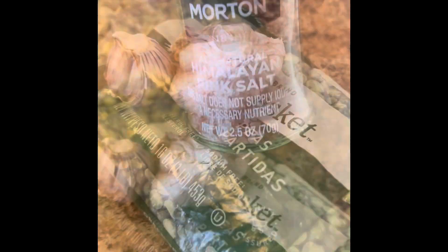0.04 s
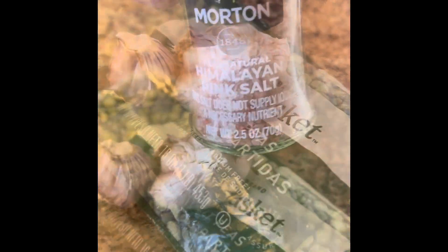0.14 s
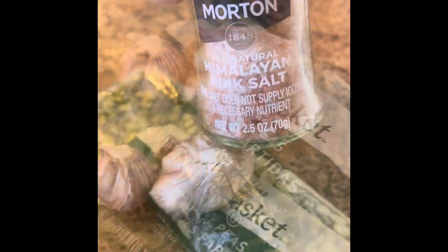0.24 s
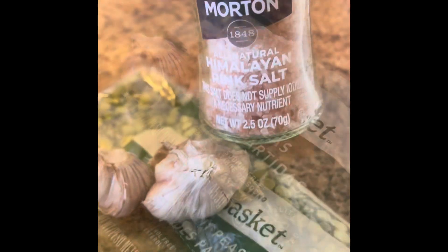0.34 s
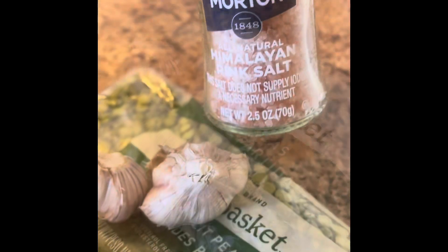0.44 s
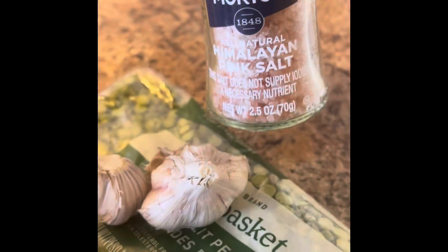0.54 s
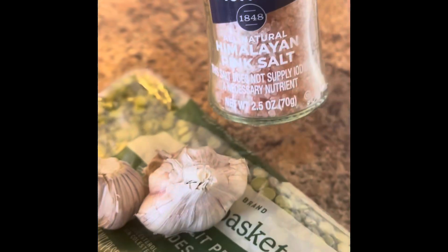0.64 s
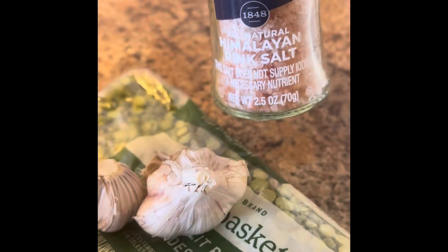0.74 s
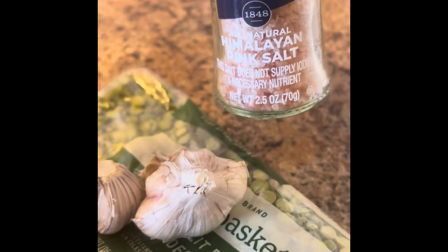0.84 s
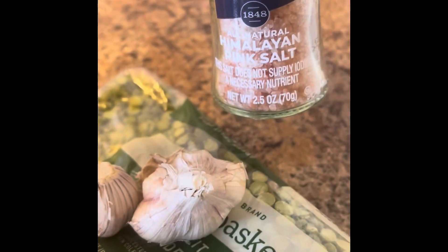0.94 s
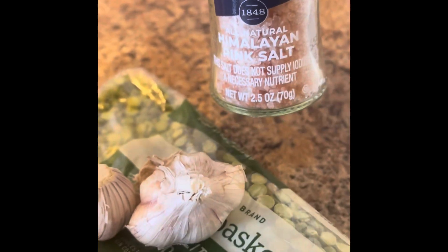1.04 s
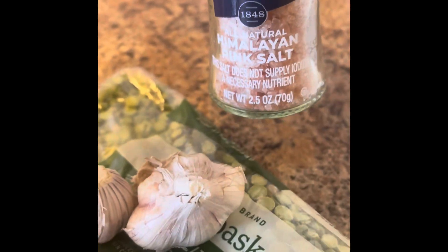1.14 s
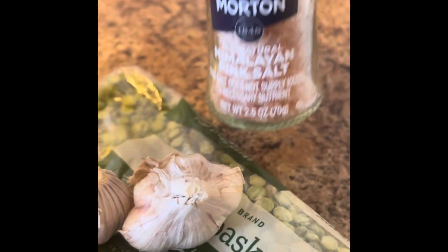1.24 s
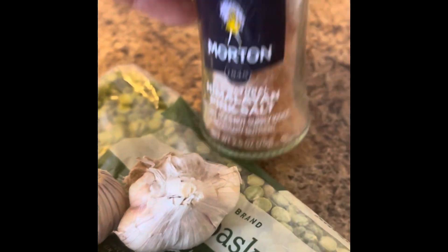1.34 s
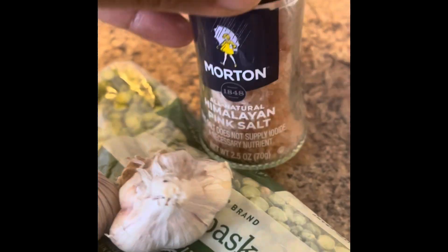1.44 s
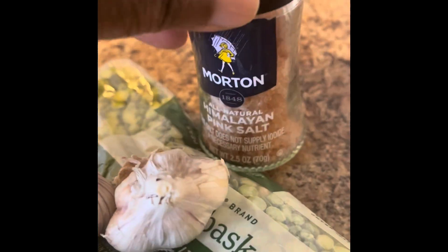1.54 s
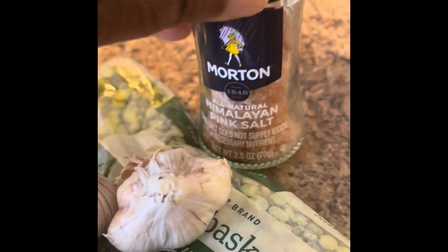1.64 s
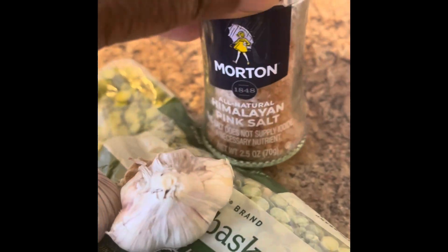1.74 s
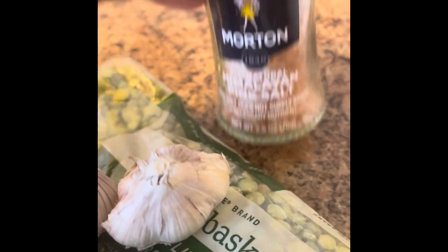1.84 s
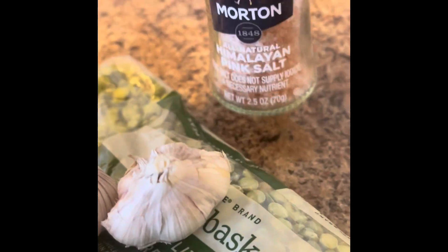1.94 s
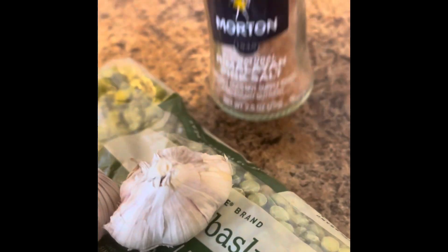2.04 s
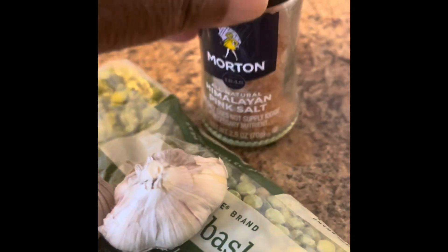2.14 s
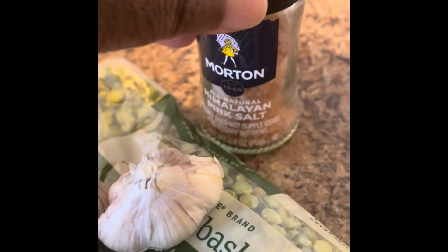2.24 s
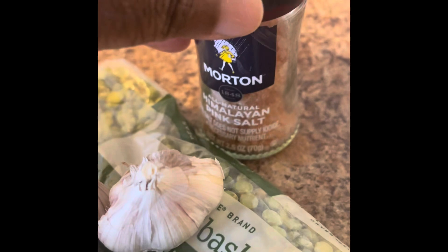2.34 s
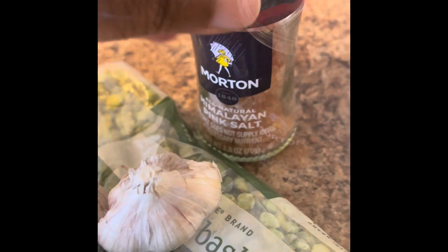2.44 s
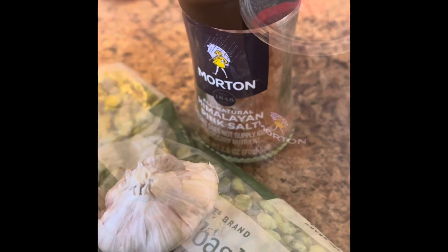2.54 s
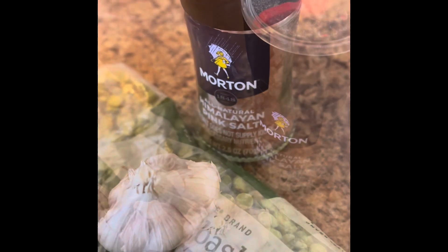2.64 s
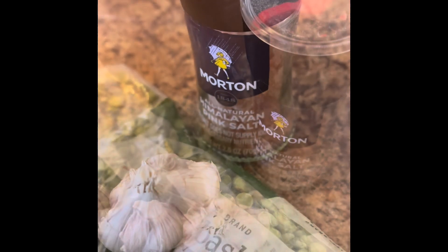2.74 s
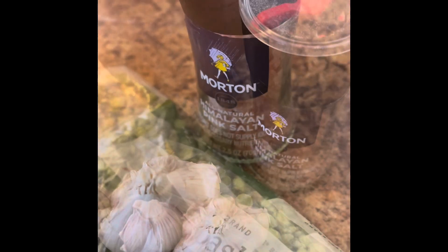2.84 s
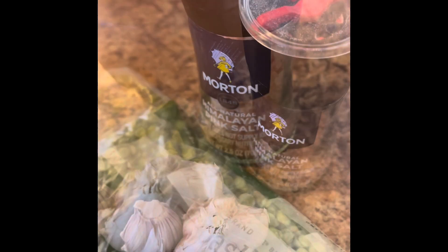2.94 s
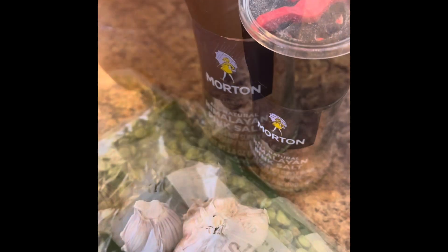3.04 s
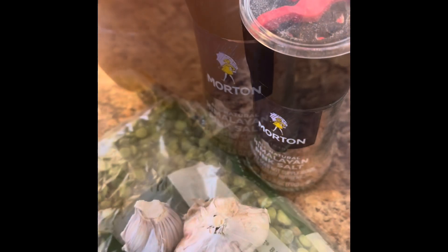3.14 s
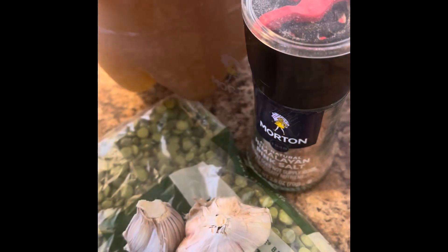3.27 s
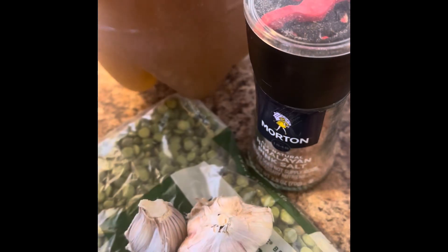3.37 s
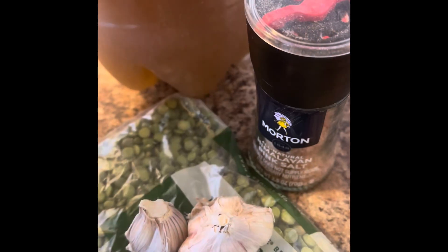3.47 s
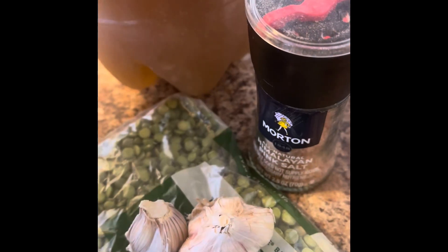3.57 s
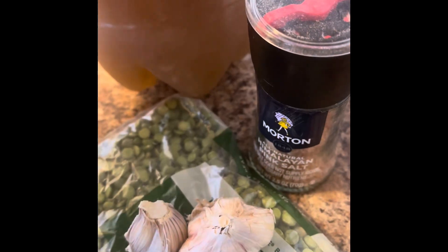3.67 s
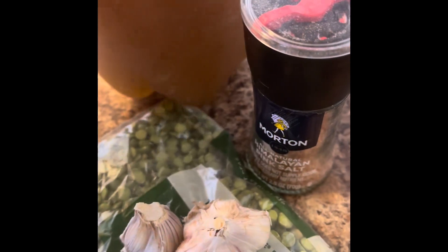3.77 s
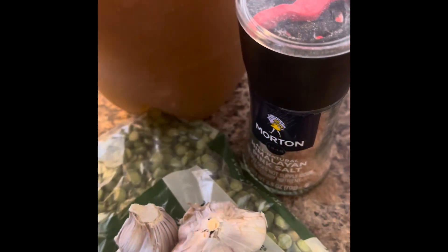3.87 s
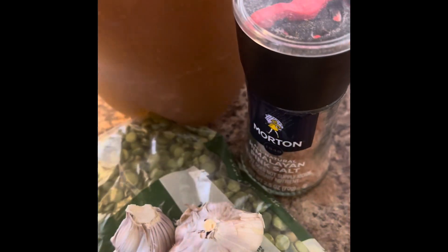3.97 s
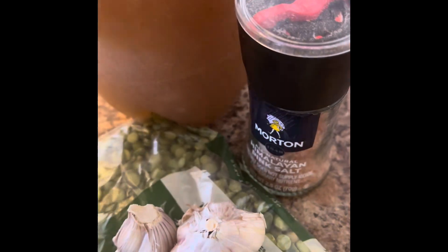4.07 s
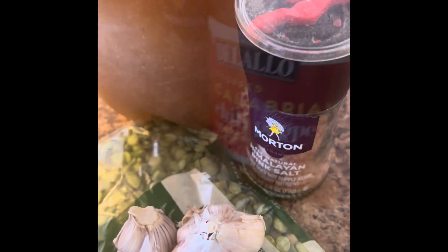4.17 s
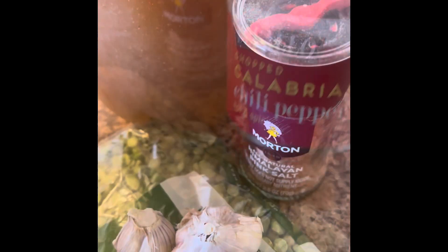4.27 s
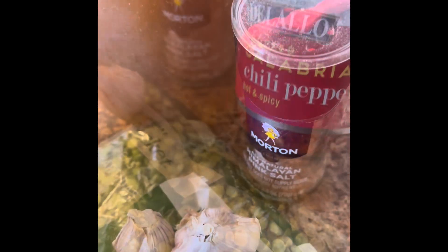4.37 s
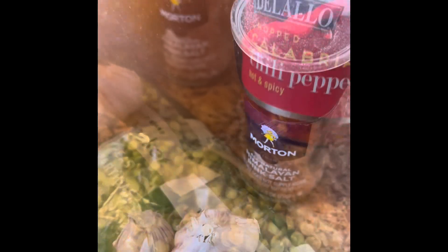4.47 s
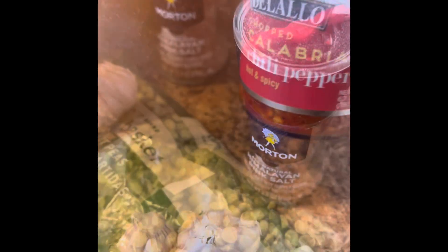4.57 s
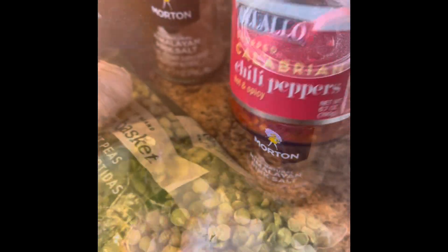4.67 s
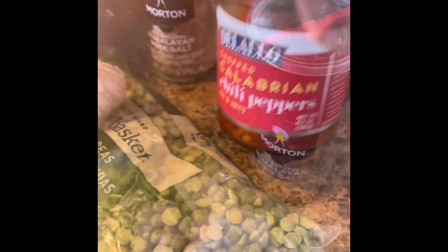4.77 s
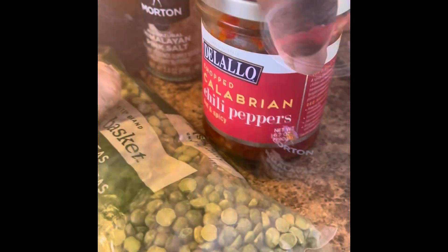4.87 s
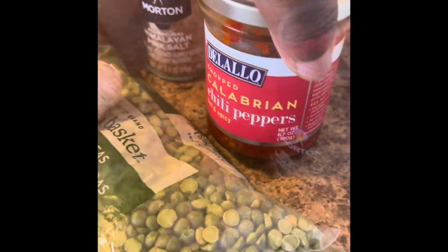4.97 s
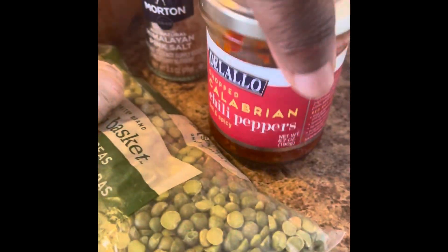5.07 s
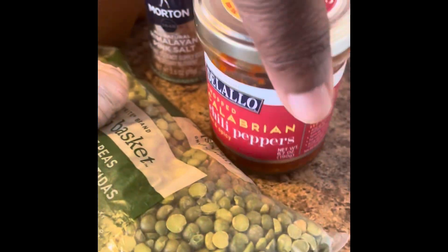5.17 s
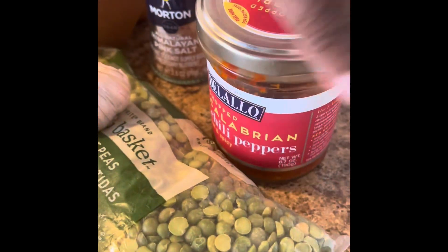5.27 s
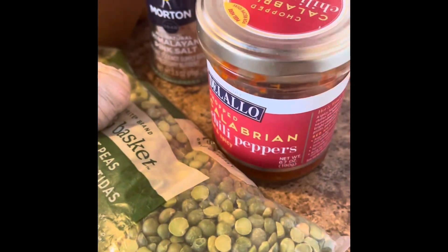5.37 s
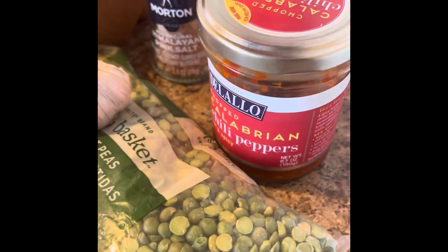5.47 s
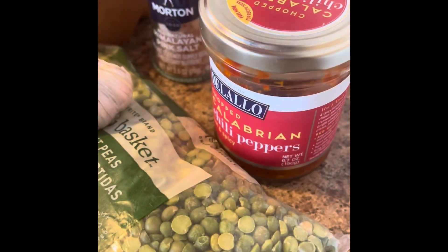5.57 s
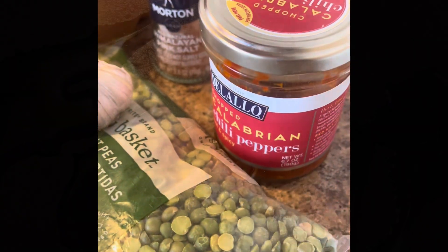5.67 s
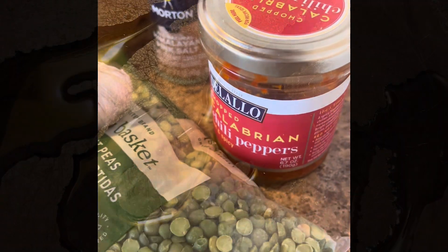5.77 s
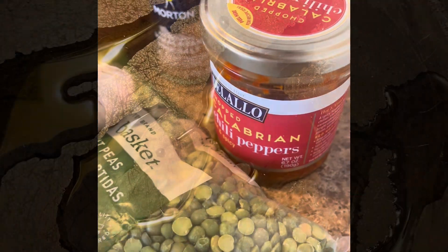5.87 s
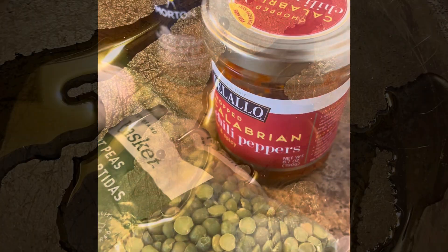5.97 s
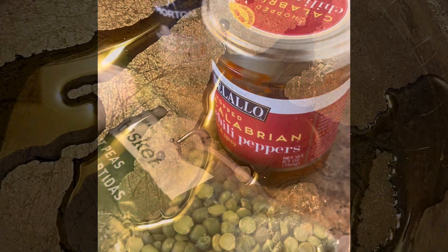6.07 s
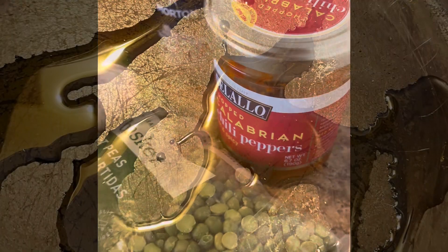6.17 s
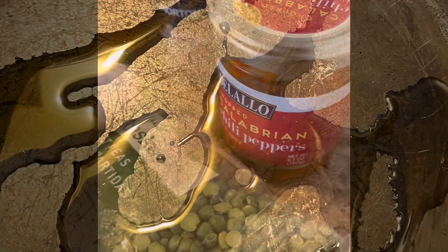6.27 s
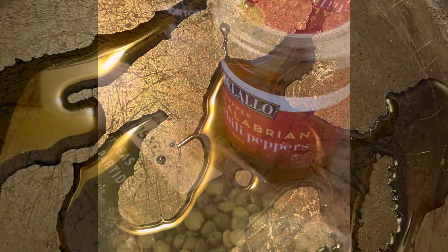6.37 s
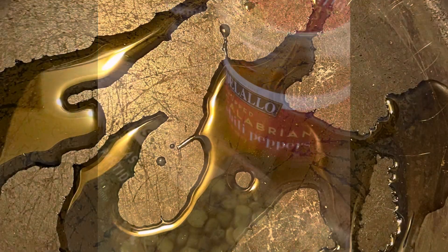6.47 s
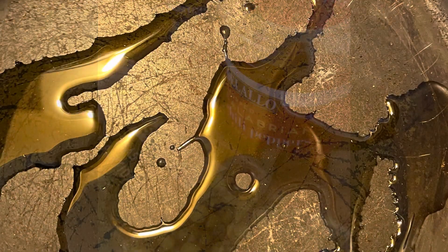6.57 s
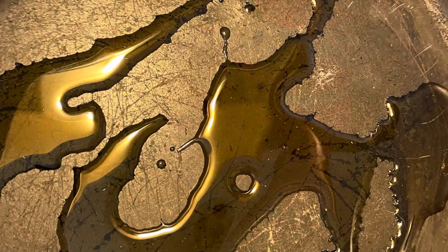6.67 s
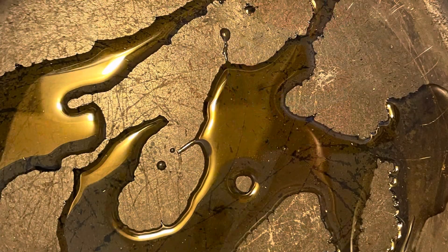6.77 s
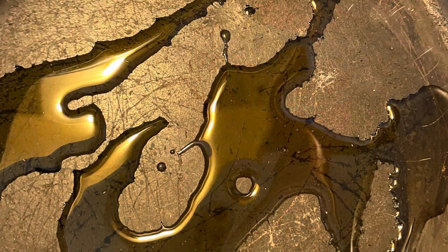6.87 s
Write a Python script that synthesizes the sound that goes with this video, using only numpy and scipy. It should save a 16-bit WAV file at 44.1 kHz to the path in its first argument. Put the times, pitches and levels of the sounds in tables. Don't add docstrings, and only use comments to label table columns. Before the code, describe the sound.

Plastic bag crackles faintly and nails tick on a stone counter, then jars land with solid knocks over a low fridge hum that fades out.

```python
import sys
import numpy as np
from scipy import signal
from scipy.fft import rfft, irfft, next_fast_len
from scipy.io import wavfile
from scipy.ndimage import uniform_filter1d

SR = 44100
rng = np.random.default_rng(int(sys.argv[2]) if len(sys.argv) > 2 else 0)


def gain_from_db(level_db):
    decades = np.asarray(level_db, float) / 20
    return 10 ** decades


def generate_wav(signal):
    frames = np.transpose(np.atleast_2d(signal))
    scaled = np.clip(frames, -1, 1) * 32767
    pcm = np.round(scaled).astype(np.int16)
    wavfile.write(sys.argv[1], SR, pcm)


N = 304510

# (pitch [Hz], likeness [0-1], left leads [rad], left-right [dB])
PORTS = [(60, 1, 0, 0), (300, .98, 0, -.5), (700, .8, .1, 0), (1200, .8, 0, 1), (1850, .96, .2, 0),
         (2300, .8, .4, 0), (2850, .8, 1.5, 0), (3450, .8, .7, 0), (4400, .8, 1.4, 0), (4850, .65, 3.14, 0),
         (5300, .85, 5.5, 0), (6000, .97, 6.35, 0), (6800, .87, 7.2, 0), (8000, .85, 8.4, 0),
         (8550, 1, 9.425, 0), (9450, 1, 9.425, 0), (9900, .9, 10.3, 0), (12000, .93, 12.4, 0),
         (13700, .9, 12.6, 0), (14600, .9, 15, 0), (16000, .9, 15.7, 0)]


def unit(x):
    return x / np.sqrt(np.mean(x ** 2) + 1e-20)


def along(points, hz, axis=1):
    rows = np.transpose(points)
    return np.interp(np.log(hz + 1), np.log(rows[0]), rows[axis])


def wobble(rate):
    knots = rng.standard_normal(int(N * rate / SR) + 2)
    return np.interp(np.arange(N) * rate / SR, np.arange(len(knots)), knots)


def filtered(x, response):
    m = next_fast_len(N + SR // 8, True)
    return irfft(rfft(x, m) * response(np.fft.rfftfreq(m, 1 / SR)), m)[..., :N]


def shaped(x, spectrum):
    return filtered(x, lambda hz: gain_from_db(along(spectrum, hz)))


def coloured(x, spectrum):
    return unit(shaped(x, spectrum))


def patchy(depth_db, size):
    z = signal.stft(rng.standard_normal((2, N)), nperseg=256)[2]
    field = uniform_filter1d(rng.standard_normal(z.shape[1:]), size=4, axis=0)
    field = uniform_filter1d(field, size=size, axis=1)
    return signal.istft(z * gain_from_db(depth_db * unit(field)), nperseg=256)[1][:, :N]


def knocks():
    # (pitch [Hz], level [dB], t60 [s])
    grinder = [(99.4, -8, 0.18), (159.1, -6.5, 0.15), (213.6, 1, 0.066), (430.3, 4.5, 0.085),
               (645, 3, 0.055), (826, -12.5, 0.16), (1043, -4.5, 0.05), (1360, 0.5, 0.04),
               (1581, -14.5, 0.072), (1900, -18, 0.027), (2404, -14.5, 0.06), (2926, -12.5, 0.013)]
    # (pitch [Hz], level [dB], t60 [s])
    cap = [(195, -16, 0.11), (287, -12.5, 0.17), (425, -9.5, 0.092), (590, -9, 0.12), (770, -8.5, 0.032),
           (934, -3.5, 0.16), (1110, -7.5, 0.023), (1357, -4.5, 0.072), (1880, -7, 0.07), (2200, 1, 0.024),
           (3350, -6, 0.041), (4170, -9.5, 0.055), (4330, -11, .05), (6060, -10.5, 0.042),
           (6240, -8, 0.032)]
    # (pitch [Hz], level [dB], t60 [s])
    jar = [(147.6, -2, 0.14), (205, -13, 0.226), (280.5, -10.5, 0.073), (347, -7.5, 0.22), (443, 6, 0.029),
           (626, 1, 0.039), (813.4, -4.5, 0.0785), (1018, -15, 0.084), (1173, -18, 0.044),
           (1438, -13, 0.0073), (1580, -34.5, 0.026), (2174, -12.5, 0.027), (546, -3.5, .07),
           (1235, -17, 0.054)]
    # (pitch [Hz], level [dB], t60 [s])
    cabinet = [(54.4, -11.5, 0.22), (103.2, 1, 0.4), (142, 10.5, 0.18), (206, -5, 0.36), (297, -16, 0.24)]
    # (pitch [Hz], level [dB], t60 [s])
    base = [(111, -10.5, 0.11), (178, 4, 0.081), (276, 0, 0.092), (346, 2.5, 0.051), (443.4, -4, 0.036),
            (620, -0.5, .04), (951, -17.5, 0.021), (1290, -11, 0.0315)]
    # (pitch [Hz], level [dB], t60 [s])
    rim = [(138.6, -16, 0.27), (277, -12, 0.17), (362, -1, 0.06), (489, 5, 0.063), (634, 0.5, 0.054),
           (847, -5, 0.071), (1025, -12, 0.03), (1200, -22.5, 0.14), (1473, -12.5, 0.024),
           (1690, -36, 0.044), (2230, -18, 0.031)]
    # (pitch [Hz], level [dB], t60 [s])
    heel = [(239, -6.5, 0.11), (329, -3, 0.024), (497, 4, 0.03), (757, -4.5, 0.043), (1000, -2.5, 0.044),
            (1130, -5, 0.025), (1500, -8, 0.018), (1900, -10.5, 0.03)]
    # (time [s], level [dB], rise [s], crack [dB])
    grinder_hits = [
        (2.055, -41.5, 0.0027, -58),
        (2.069, -23, 0.0014, -46.5),
        (2.0724, -6, .0012, -15),
        (2.0784, -16, 0.0014, -40),
    ]
    # (time [s], level [dB], rise [s], crack [dB])
    cap_hits = [
        (3.677, -42.5, .003, -59.5),
        (3.6849, -18, .0009, -26.5),
        (3.705, -30, .001, -39),
        (3.7113, -6, 0.00056, -16),
    ]
    # (time [s], level [dB], rise [s], crack [dB])
    jar_hits = [
        (4.85, -42, 0.0021, -57),
        (4.8585, -7.5, 0.0008, -20.5),
        (4.8683, -14.5, .001, -38.5),
    ]
    # (time [s], level [dB], rise [s], crack [dB])
    cabinet_hits = [
        (1.473, -39, 0.001, -76),
        (2.074, -21.5, .003, -77),
        (3.713, -31, 0.0052, -72),
    ]
    # (time [s], level [dB], rise [s], crack [dB])
    base_hits = [
        (1.6504, -29, 0.002, -48),
        (1.683, -46, 0.0029, -72),
    ]
    # (time [s], level [dB], rise [s], crack [dB])
    rim_hits = [
        (5.112, -34, 0.0034, -52),
        (5.118, -16.5, 0.0029, -48),
        (5.1231, -16.5, 0.0024, -35.5),
        (5.126, -14, 0.0012, -37.5),
    ]
    # (time [s], level [dB], rise [s], crack [dB])
    heel_hits = [
        (2.0615, -20.5, 0.0033, -55),
        (3.8087, -9, 0.0002, -34.5),
    ]
    # (pitch [Hz], level [dB per Hz])
    crack_colour = [(200, -22.5), (700, 5), (2500, -2), (4000, -7.5), (7000, -22), (10500, -15),
                    (12200, -25), (13500, -41.5), (16000, -62.5)]
    # (pitch [Hz], level [dB per Hz])
    rattle = [(60, -19), (150, 1), (400, 4), (800, -7.5), (1500, -17), (2500, -31), (5000, -34.5),
              (12000, -41), (13000, -81)]
    bodies = [(grinder, grinder_hits), (cap, cap_hits), (jar, jar_hits), (cabinet, cabinet_hits),
              (base, base_hits), (rim, rim_hits), (heel, heel_hits)]
    bend_lag_s = 0.0022
    ring, crack, shake = np.zeros((3, 2, N))
    t = np.arange(SR // 4) / SR
    crack_fall = gain_from_db(-60 * t / 0.0073) + gain_from_db(-8.0 - 60 * t / 0.063)
    for modes, hits in bodies:
        for s, db, rise, crack_db in hits:
            at = slice(round(s * SR), round(s * SR) + len(t))
            for k, (hz, level, t60) in enumerate(modes):
                wander = uniform_filter1d(rng.standard_normal(len(t)), size=24)
                drift = 0.00058 * hz ** .7 * np.cumsum(wander)
                phase = np.pi * k + drift + [[0], [2 * np.pi * rng.random()]]
                late = np.maximum(t - bend_lag_s * np.sqrt(100 / hz), 0)
                swell = (1 - np.exp(-late / (0.55 * rise + 0.064 / hz))) ** 2
                fall = gain_from_db(db + level - 60 * t / t60)
                ring[:, at] += fall * np.sin(2 * np.pi * hz * late + phase) * swell
            crack[:, at] += gain_from_db(crack_db + 11.5) * crack_fall * rng.standard_normal((2, len(t)))
            tremble = gain_from_db(db + 3.0 - 60 * t / 0.14) * (1 - np.exp(-t / .004))
            shake[:, at] += tremble * rng.standard_normal((2, len(t)))
    return ring + shaped(crack, crack_colour) + shaped(shake, rattle)


def thumps():
    # (time [s], level [dB], pitch [Hz], t60 [s])
    pushes = [(1.432, -38.5, 201, 0.067), (1.438, -43.5, 95.5, 0.2), (1.656, -35, 135.1, 0.16),
              (2.076, -20, 62.2, 0.1), (2.079, -18.5, 101.1, 0.11), (2.259, -46.5, 195, 0.12),
              (2.286, -39.5, 118, 0.29), (2.36, -38, 177.5, 0.21), (2.38, -42.5, 105.9, 0.21),
              (2.488, -38.5, 180.4, 0.26), (3.686, -18.5, 272.2, 0.057), (3.733, -15, 186.5, 0.12),
              (3.786, -19, 320, 0.077), (3.792, -11.5, 89.3, 0.16), (3.812, -8.5, 205, .05),
              (3.8146, -9, 100.4, 0.14), (3.83, -15.5, 45, 0.13), (3.836, -14.5, 205, 0.05),
              (3.72, -20.5, 60.64, 0.16), (3.835, -24.5, 313.1, 0.079), (3.868, -25, 115.2, .08),
              (3.882, -23.5, 84.6, 0.083), (3.926, -23, 66.8, .1), (4.135, -30, 188.6, 0.11),
              (4.157, -28.5, 125.5, 0.11), (4.19, -31, 85.65, 0.093), (4.212, -31, 91.54, 0.073),
              (4.864, -17, 195, 0.073), (4.868, -21, 142, 0.3), (5.132, -30.5, 139.3, 0.11),
              (5.634, -35.5, 190, 0.17), (5.712, -37.5, 105.4, 0.16), (5.79, -36, 104, 0.12)]
    rise_cycles = 0.16
    low, t = np.zeros((2, N)), np.arange(SR // 4) / SR
    for s, db, hz, t60 in pushes:
        swing = np.sin(2 * np.pi * hz * t + [[0], [np.pi / 2]])
        swell = 1 - np.exp(-t * hz / rise_cycles)
        low[:, round(s * SR):][:, :len(t)] += gain_from_db(db - 60 * t / t60) * swing * swell
    return low


def ticks():
    # (pitch [Hz], width [Hz])
    bands = [(1400, 1300), (2550, 810), (4200, 1700), (6600, 2400), (10800, 2000), (14300, 2300)]
    # (time [s], level [dB], pitch [Hz], fall either side [dB per octave])
    taps = [(1.307, -58, 2550, 5), (1.3145, -42, 1900, 9), (1.3185, -40, 2200, 15),
            (1.3277, -40, 3100, 8.5), (1.3335, -45, 2600, 5), (1.342, -47, 2500, 11), (1.35, -50, 2300, 8),
            (1.383, -52, 3500, 1), (1.395, -52, 6600, 5), (1.4755, -59, 3000, 3), (1.487, -49, 2000, 13),
            (1.4274, -43.5, 3500, 10), (1.4706, -52.5, 3000, -2), (1.523, -67, 3000, 11),
            (1.5756, -56.5, 2550, 25), (1.594, -49.5, 2700, 22), (1.606, -57, 2800, 7),
            (1.6421, -49, 1500, 15), (1.6907, -48.5, 6650, 23), (1.732, -52.5, 2500, 5),
            (1.7675, -54.5, 2400, 10.5), (1.808, -55.5, 1800, 3.5), (2.2704, -53.5, 2550, 3.5),
            (2.5918, -38.5, 1800, 33), (2.277, -51, 2300, 17), (2.3745, -52.5, 7030, 24),
            (2.9492, -33, 2455, 20), (3.084, -43.5, 1990, 22), (3.3162, -50.5, 3070, 15.5),
            (3.7892, -24.5, 3288, 4.5), (3.831, -32, 4200, 6), (3.8539, -36, 2515, -0.5),
            (3.8649, -33.5, 3405, 11), (3.8975, -37, 1400, 8.5), (3.905, -29, 3850, 11),
            (3.9148, -32.5, 3100, 8.5), (3.9205, -34.5, 3000, 6.5), (3.7293, -29, 2500, 4),
            (3.773, -38, 3000, 3), (3.7945, -35, 4500, 4), (4.024, -54.5, 6600, 20),
            (4.1251, -39.5, 6000, -0.5), (4.0715, -42, 1400, 40), (4.104, -68, 2522, 12),
            (4.125, -43, 1400, 7), (4.2588, -51, 1360, 15.5)]
    # (time [s], level [dB], fall below the top resonance [dB per octave])
    snaps = [(0.108, -47.5, 16.5), (0.219, -56, 27), (0.25, -48, 39), (0.275, -53, 29), (.241, -62, 20),
             (0.2957, -46.5, 12.5), (.35, -62, 26), (.367, -69, 30), (0.411, -66, 24), (1.3766, -39, 4.5),
             (1.4047, -37, 7), (1.684, -55, 13), (1.747, -47.5, 10), (1.897, -65, 13.5), (1.957, -65, 15.5),
             (2.3735, -48.5, 16), (2.7172, -50.5, 13.5), (2.757, -59, 14), (2.9494, -32, 7.5),
             (3.7765, -23.5, 7), (3.8205, -30.5, 1), (3.9603, -35.5, 16.5), (3.977, -45, 11),
             (3.988, -52, 14.5), (3.9965, -42, 12), (4.012, -56, 15), (4.058, -50, 12), (4.03, -43.5, 21),
             (4.042, -48, 20.5), (4.066, -25.5, 24.5), (4.2654, -38.5, 37), (4.316, -46, 24),
             (4.665, -54.5, 31.5), (5.5697, -57.5, 30), (5.684, -62, 30), (5.77, -49.5, 19)]
    snap_hz, scatter_db = 10600, 2.5
    top_loss_db, tap_dull_db = 14.5, 12
    clicks, t = np.zeros((2, N)), np.arange(2048) / SR
    half = len(t) // 2
    shape = gain_from_db(-60 * t / 0.0028) + gain_from_db(-8.5 - 60 * t / 0.024)
    f = np.fft.rfftfreq(2 * len(t), 1 / SR)
    bells = np.array([np.sqrt(SR / w) * np.exp(-((f - hz) / w) ** 2) for hz, w in bands])
    centres = np.transpose(bands)[0]
    for s, db, hz, fall_db in taps + [(s, db, snap_hz, fall_db) for s, db, fall_db in snaps]:
        chance_db = scatter_db * rng.standard_normal(len(centres))
        levels_db = db - fall_db * np.abs(np.log2(centres / hz)) + chance_db
        levels_db[-1] -= top_loss_db + (tap_dull_db if hz != snap_hz else 0)
        burst = shape * np.sign(rng.standard_normal((2, len(t))))
        spectrum = rfft(np.pad(burst, ((0, 0), (half, half))))
        even = spectrum / np.abs(spectrum) ** .5 * np.linalg.norm(shape) ** .5
        clicks[:, round(s * SR) - half:][:, :2 * len(t)] += irfft(even * (gain_from_db(levels_db) @ bells))
    return gain_from_db(-1.5) * clicks


def bag():
    # (time [s], held [s], level [dB], crisp over it [dB], dying away [dB per s])
    grips = [(0.092, 0.028, -86, 22.5, 305), (0.18, 0.03, -89.5, 24, 296.5), (.25, .04, -102, 29, 300),
             (.3, 0.03, -83.5, 16, 152), (1.311, 0.028, -47, 0.5, 490), (1.358, 0.12, -53, 1, 502),
             (1.49, 0.062, -81, -4, 202), (1.57, 0.068, -69.5, -9, 403), (1.641, 0.021, -69.5, 4, 495),
             (1.685, 0.12, -64, 2, 500), (2.12, 0.13, -89.5, 23, 300), (2.25, 0.089, -63, -0.5, 249),
             (2.36, 0.034, -65.5, 8.5, 300), (2.54, 0.03, -86.5, 18, 295.5), (2.715, 0.051, -86.5, 19, 193),
             (2.96, 0.019, -62, 2.5, 256), (3.725, 0.023, -35.5, -17.5, 397), (3.745, 0.018, -44, -10, 393),
             (3.772, 0.07, -41.5, 5, 802), (3.789, 0.0051, -38.5, -6, 600), (3.85, .075, -42, 0.5, 907),
             (3.928, 0.018, -60.5, -1, 600), (3.957, 0.074, -67, 14.5, 195.5),
             (4.067, 0.021, -69.5, 10.5, 156.5), (4.1, .03, -65, -4.5, 149), (4.266, 0.015, -81, 25, 400),
             (4.655, .045, -89, 19, 300), (5.184, 0.027, -59, -4, 400), (5.772, 0.017, -78, 12, 300)]
    # (pitch [Hz], level [dB per Hz])
    body_colour = [(400, -42), (900, -8.5), (2200, -4.5), (4000, -10), (6500, -16), (12000, -51)]
    # (pitch [Hz], level [dB per Hz])
    crisp_colour = [(2500, -42.5), (4500, -17), (6500, -7.5), (8500, 4.5), (10500, 2.5), (11700, -4.5),
                    (12300, -39), (16000, -70.5)]
    # (pitch [Hz], level [dB per Hz])
    sheen_colour = [(11500, -40.5), (12300, 0), (14000, -4.5), (14700, -25), (16000, -38)]
    rise_db_per_s, sag_db_per_s, fidget_db = 3498.5, 27.5, 1.5
    sheen_db, knee_db = -10.5, -52.5
    t, body, crisp = np.arange(N) / SR, 0, 0
    for s, held, db, crisp_db, dying in grips:
        before, after = np.maximum(s - t, 0), np.maximum(t - s - held, 0)
        grip = gain_from_db(db - rise_db_per_s * before - sag_db_per_s * np.clip(t - s, 0, held) - dying * after)
        body, crisp = body + grip, crisp + gain_from_db(crisp_db) * grip
    snaps = (rng.random(N) < 300 / SR) * gain_from_db(6 * rng.random(N))
    grain = 2.6 + unit(signal.lfilter([1], [1, -.97], snaps))
    creases = grain * patchy(depth_db=4.0, size=3) * gain_from_db(fidget_db * wobble(45))
    sheen = gain_from_db(sheen_db) * crisp * (crisp / (crisp + gain_from_db(knee_db))) ** 3
    dull_and_crisp = body * coloured(creases, body_colour) + crisp * coloured(creases, crisp_colour)
    return dull_and_crisp + sheen * coloured(creases, sheen_colour)


def fridge():
    # (time [s], level [dB])
    hum_level = [(0.0, -51), (0.42, -58.5), (1.09, -59), (1.37, -56.5), (1.72, -60.5), (1.95, -54.5),
                 (2.12, -43.5), (2.4, -46.5), (2.9, -51), (3.61, -43.5), (4.15, -42.5), (4.5, -48),
                 (4.83, -48), (5.07, -41.5), (5.37, -43), (5.95, -47.5)]
    # (time [s], cabinet shake re rumble [dB], extra air [dB])
    coupling = [
        (0, -8.5, 5.5),
        (.45, -13, 2),
        (1.85, -20.5, 0),
        (2.25, -17.5, 4),
        (2.95, -6.5, 1),
        (4.5, -8.5, 0.5),
        (4.9, -8, 0),
        (5.95, -8, 5),
    ]
    # (pitch [Hz], level [dB per Hz])
    rumble_colour = [(40, -42), (75, -13), (108, -3.5), (125, -18.5), (143, 1.5), (162, -13.5), (190, 4.5),
                     (215, -4.5), (250, -15), (340, -5), (385, -13.5), (425, -8.5), (480, -11.5),
                     (530, -22), (700, -28), (1200, -88)]
    # (pitch [Hz], level [dB per Hz])
    air_colour = [(300, -36.5), (500, 6), (1300, -7.5), (1900, -11.5), (2100, -13.5), (2350, -12),
                  (2800, -22), (3250, -17.5), (3450, -17.5), (3700, -21.5), (4150, -21), (4400, -17.5),
                  (4700, -21.5), (5900, -23.5), (6900, -22), (10500, -19.5), (12000, -31.5), (12600, -55)]
    # (multiple of shaft speed, level re rumble [dB])
    orders = [(6, -11), (7, -13), (13, -32.5), (14, -24), (15, -26.5), (19, -37), (20, -25.5), (21, -28)]
    # (pitch [Hz], level [dB per Hz])
    sway = [(15, -38.5), (35, -9), (55, -0.5), (75, -12.5), (110, -42), (200, -100)]
    shaft_hz, air_db = 59.2, -19.5
    fade_from_s, fade_to_s, fade_power = 5.91, 6.705, 1.305
    t = np.arange(N) / SR
    left = np.clip((fade_to_s - t) / (fade_to_s - fade_from_s), 0, 1) ** fade_power
    pose_s, *columns = np.transpose(coupling)
    shake_db, extra_db = (np.interp(t, pose_s, column) for column in columns)
    level = gain_from_db(np.interp(t, *np.transpose(hum_level))) * left
    turn = 2 * np.pi * np.cumsum(shaft_hz * (1 + 0.00077 * wobble(1.0))) / SR
    lines = 0
    for k, db in orders:
        lines = lines + gain_from_db(db + 2.0 * wobble(4)) * np.sin(round(k) * turn + 6 * rng.random((2, 1)))
    shaft = gain_from_db(4.0 + 1.2 * wobble(0.81)) * np.sin(turn)
    shaft = shaft + gain_from_db(-7.0) * coloured(rng.standard_normal((2, N)), sway)
    rumble = coloured(rng.standard_normal((2, N)), rumble_colour) * gain_from_db(-0.5 + 1.4 * wobble(9.6))
    air = coloured(patchy(depth_db=1.5, size=40), air_colour) * gain_from_db(air_db + extra_db + 0.4 * wobble(3.3))
    return level * (rumble + lines + air + gain_from_db(shake_db) * shaft)


def kitchen(x):
    # (pitch [Hz], t60 [s])
    room_t60 = [(100, .5), (500, 0.37), (2000, 0.38), (6000, .33), (11500, 0.28), (13000, 0.19)]
    hz, t, z = signal.stft(rng.standard_normal((2, SR // 2)), SR, nperseg=256)
    tail = signal.istft(z * gain_from_db(-60 * t / along(room_t60, hz)[:, None]), SR, nperseg=256)[1]
    delayed = np.pad(x, ((0, 0), (200, 0)))
    answer = signal.fftconvolve(delayed, tail / np.linalg.norm(tail[0]), axes=1)[:, :N]
    z = signal.stft(answer, nperseg=256)[2]
    return signal.istft(z * np.exp(2j * np.pi * rng.random(z.shape)), nperseg=256)[1][:, :N]


def ports(pair, table):
    m = next_fast_len(N + SR // 8, True)
    hz = np.fft.rfftfreq(m, 1 / SR)
    turn = np.arccos(np.clip(along(table, hz), 0, 1)) / 2
    mid, side = rfft(pair, m) * [np.cos(turn), np.sin(turn)]
    half = np.exp(.5j * along(table, hz, axis=2)) * gain_from_db(along(table, hz, axis=3) / 2)
    return irfft(np.array([(mid + side) * half, (mid - side) / half]), m)[:, :N]


def scene():
    # (time [s], share [0-1])
    turned = [
        (0, 0),
        (2.6, 0.02),
        (3.3, 0.95),
        (4.2, 1),
        (4.95, 0),
        (6.9, 0.05),
    ]
    # (pitch [Hz], likeness [0-1], left leads [rad], left-right [dB])
    turned_ports = [(40, 0.96, 1.8, -0.5), (87.2, 1.0, 0.24, -4.5), (204.4, 0.98, 1.0, -9),
                    (320, 0.86, -3.5, -8), (506, .87, -3.0, 2), (830, 0.71, -2.5, 1.5),
                    (1110, 0.32, -1.0, 1.5), (1600, 0.6, 0.56, 0.5)] + PORTS[4:]
    t = np.arange(N) / SR
    near = knocks() + thumps() + ticks()
    near = near + gain_from_db(-18.5) * kitchen(near) + bag()
    hum = fridge()
    share = np.interp(t, *np.transpose(turned), right=0)
    middle = (t > 2.9) & (t < 4.8)
    upright = ports(near * ~middle + hum * np.sqrt(1 - share), PORTS)
    return upright + ports(near * middle + hum * np.sqrt(share), turned_ports)


def low_pass(x):
    return signal.sosfilt(signal.butter(12, 16810, fs=SR, output="sos"), x)


def record(dry):
    # (pitch [Hz], level [dB])
    microphone = [(15, -25.5), (45, -2.5), (80, 0.5), (11500, -1.5), (13000, -10.5), (16000, -17),
                  (16700, -24.5), (16900, -70.5)]
    overloaded = dry / (1 + np.abs(dry / 0.82) ** 6) ** (1 / 6)
    mix = shaped(overloaded, microphone)
    return low_pass(mix)


dry = scene()
out = record(dry)
generate_wav(out)
```